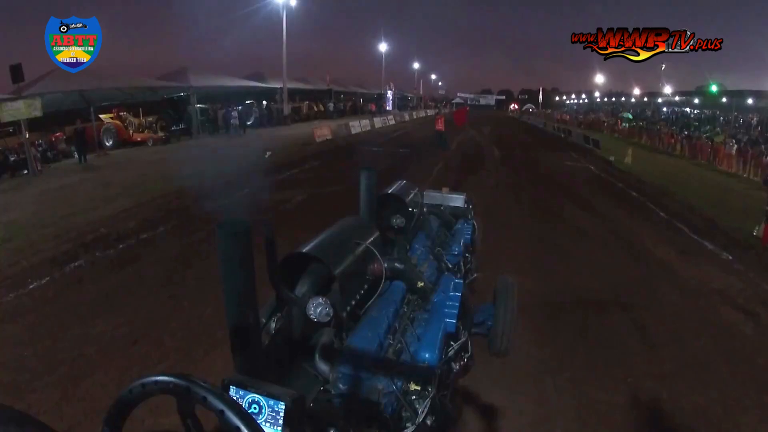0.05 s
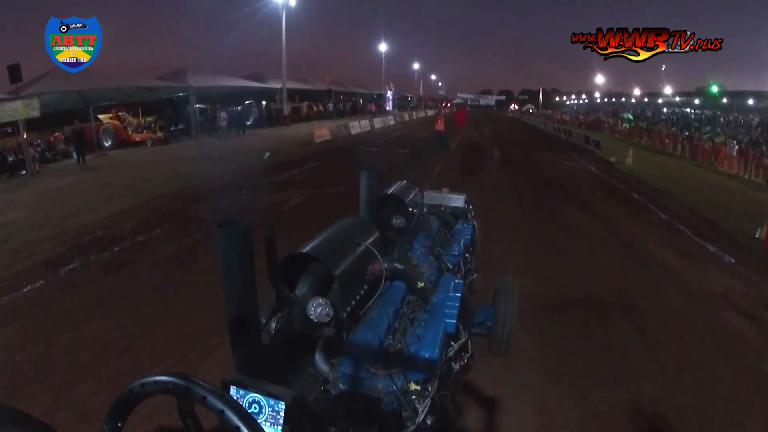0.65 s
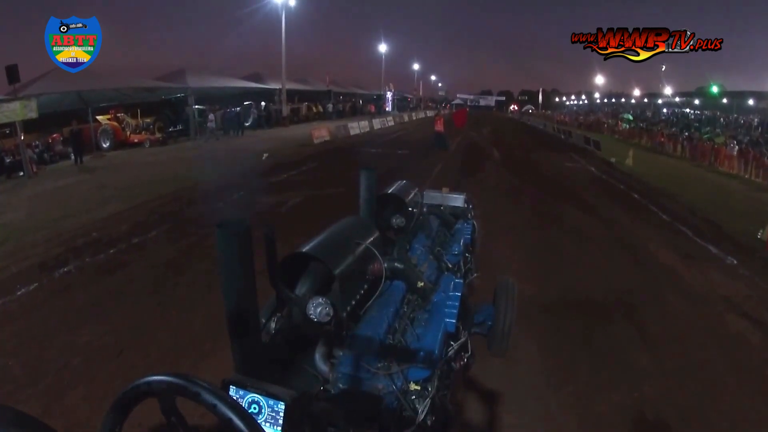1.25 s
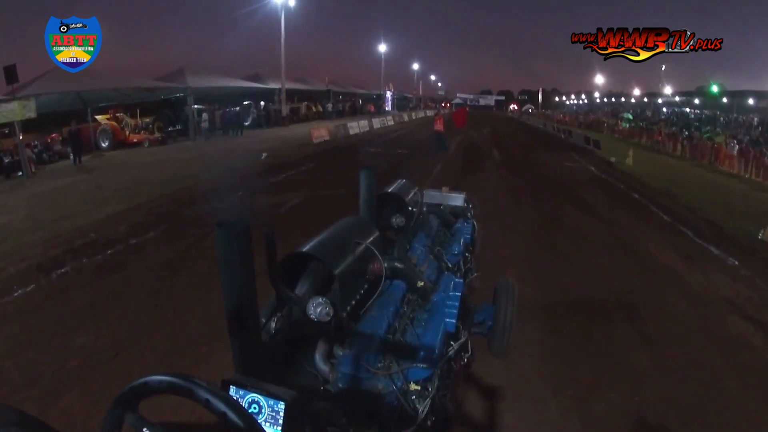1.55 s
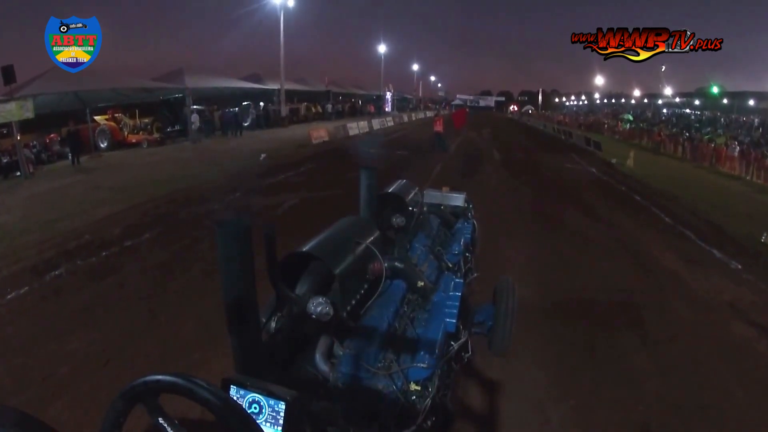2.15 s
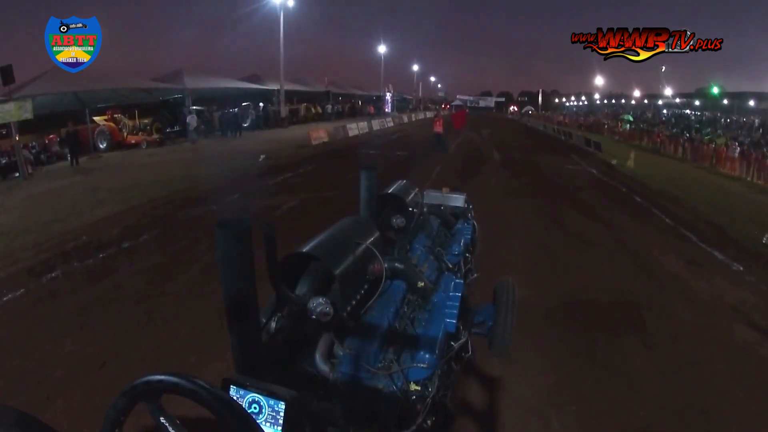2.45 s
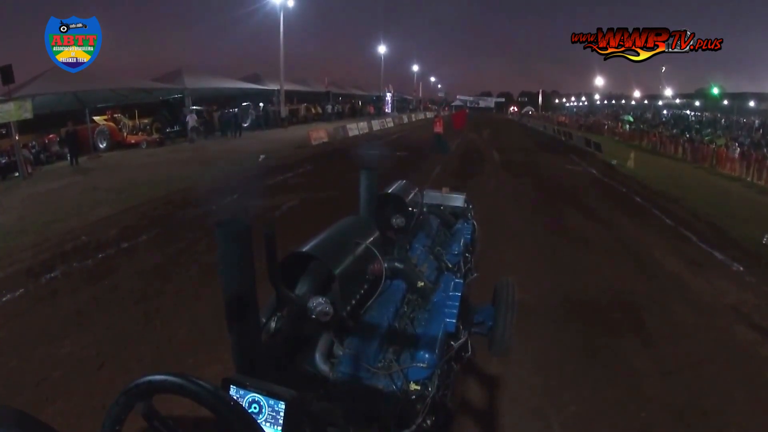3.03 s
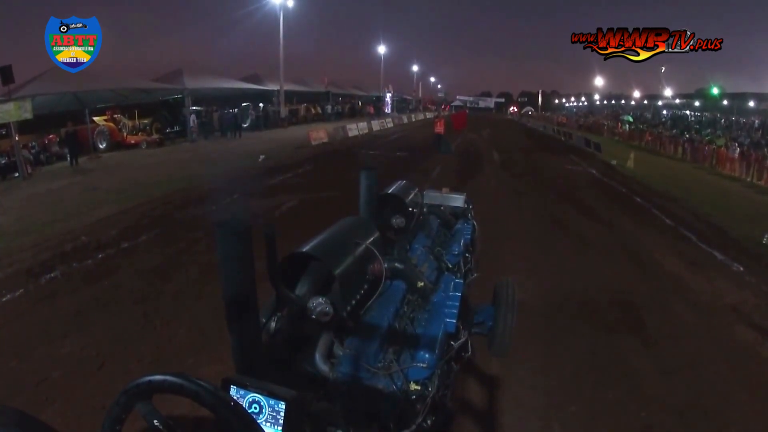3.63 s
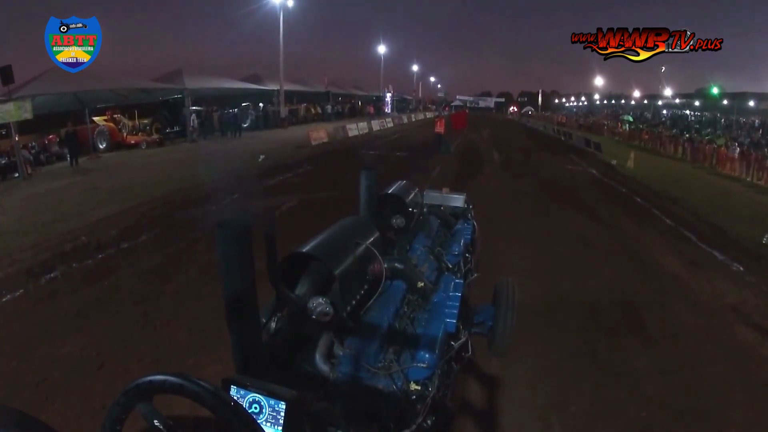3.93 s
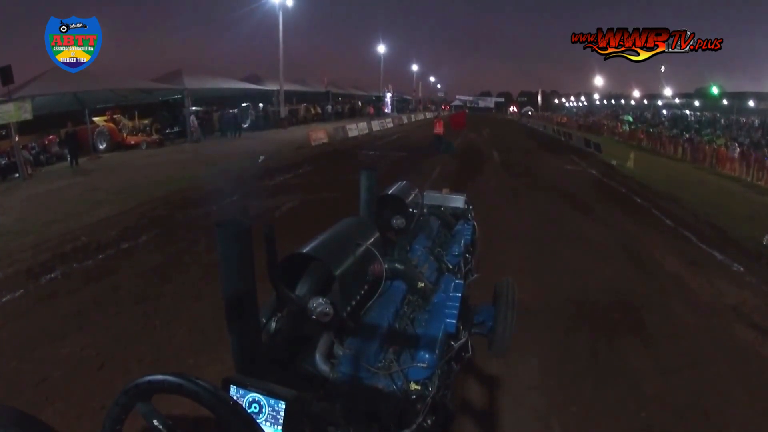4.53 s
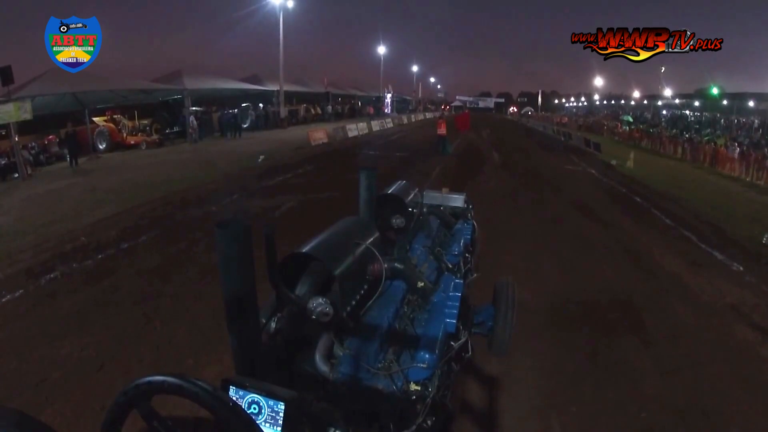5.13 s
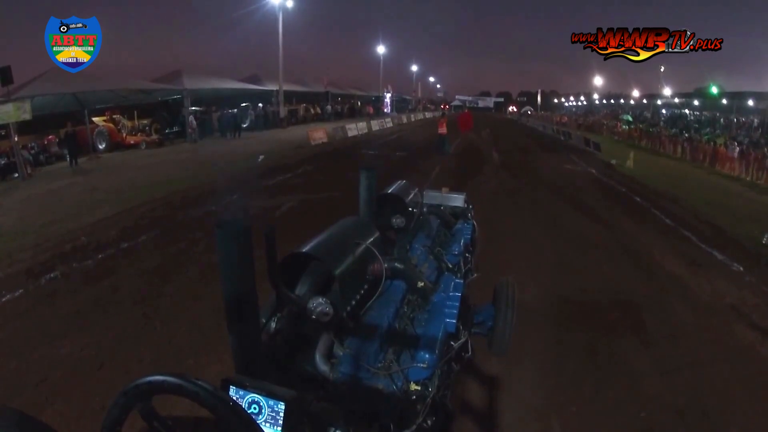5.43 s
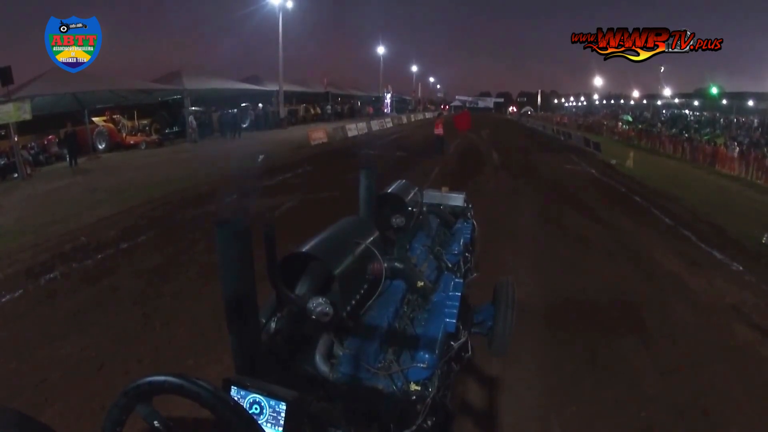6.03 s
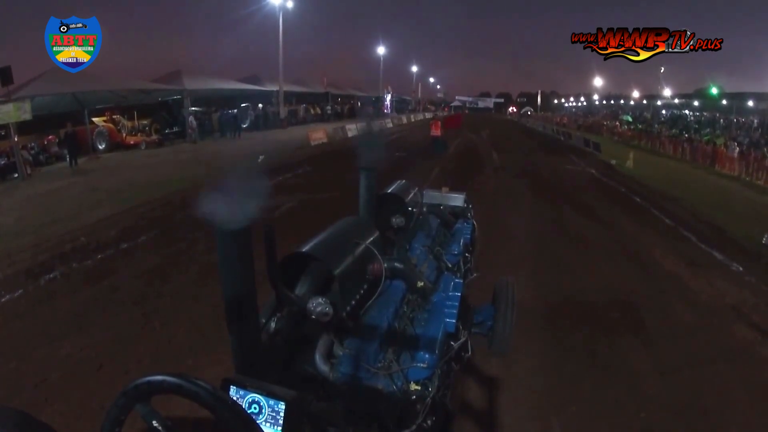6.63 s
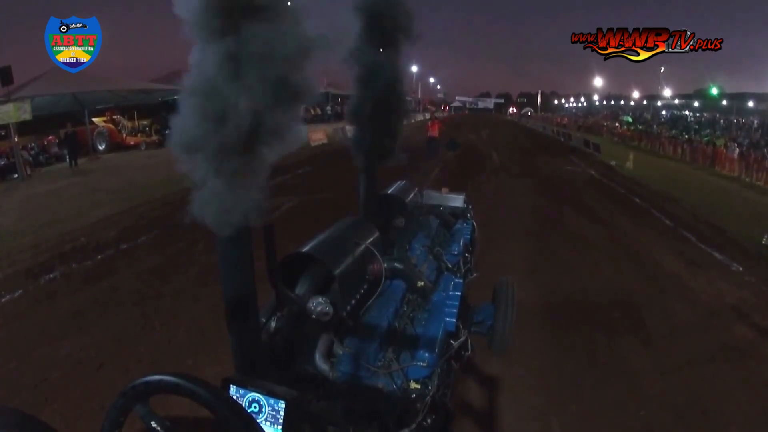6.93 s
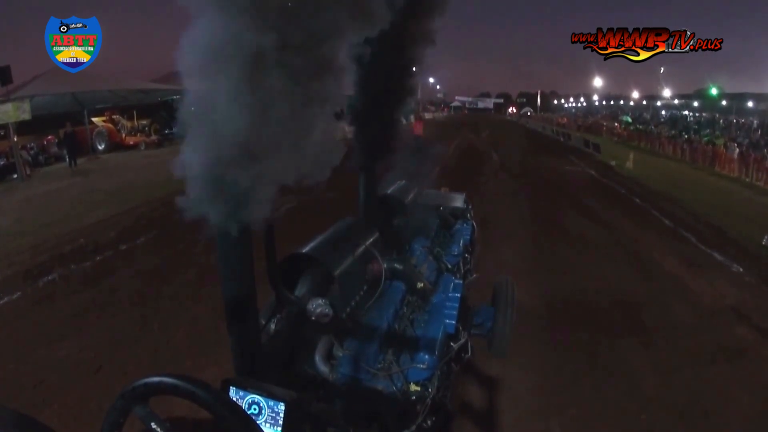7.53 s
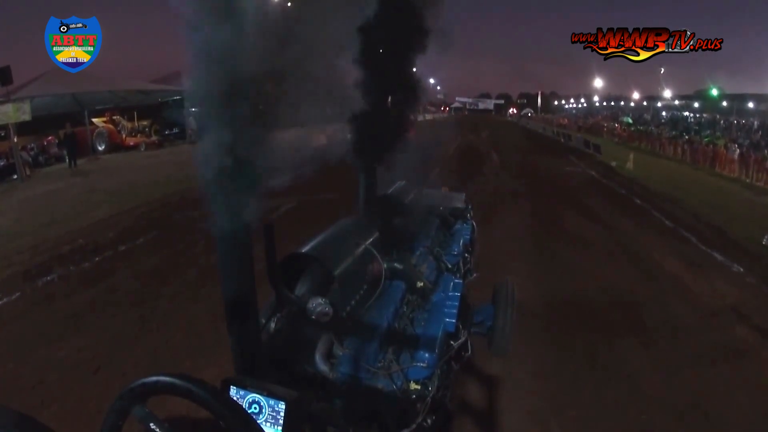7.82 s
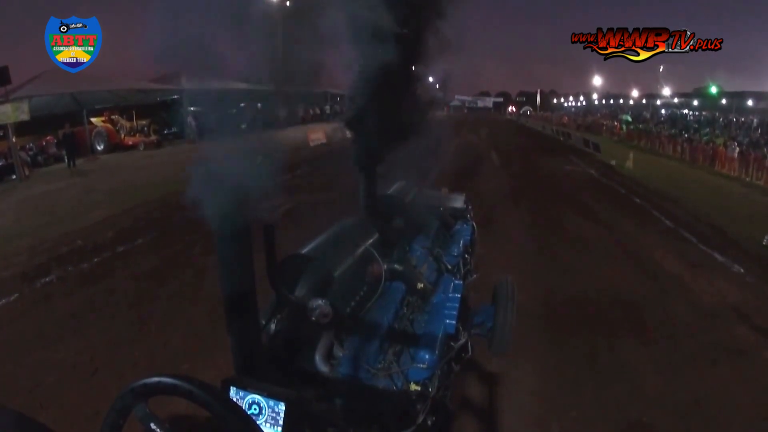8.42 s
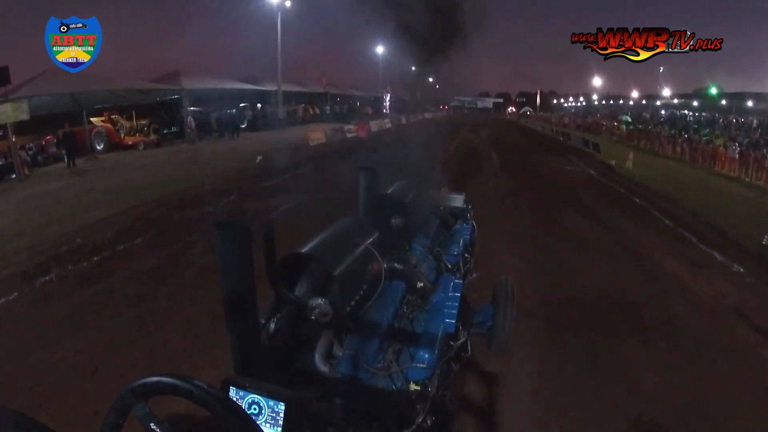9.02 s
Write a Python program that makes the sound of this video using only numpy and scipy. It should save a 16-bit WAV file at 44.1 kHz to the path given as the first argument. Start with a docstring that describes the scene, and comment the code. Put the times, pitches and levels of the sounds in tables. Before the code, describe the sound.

A six-cylinder diesel pulling tractor is heard close up from the driver's seat. For the first six seconds it lopes at idle in quick, uneven surges: the exhaust stack booms, chugs and spits gas, the valve gear clatters, and the hardest firings clack on the engine block. A faint, short hoot falls in pitch at about 1 second. Between 5.7 and 6 seconds loose metal clanks three times. From about 6.2 seconds the engine is pulled down under load, with slower, heavy chugs, harder knocking and a thin steel rattle. It sinks to its slowest beat just after 8 seconds, then revs up quickly from about 8.3 seconds into a faster, free-spinning drone that holds until the end, a little past 9 seconds. A faint, thin turbo whistle rises from 8.5 seconds, and one bit of grit ticks close by at about 8.8 seconds.

```python
"""A six-cylinder diesel pulling tractor, heard from the driver's seat.
It lopes at idle in surges of hard firings, is lugged down under load, then revs up free.
Each firing booms and chugs in the exhaust stack, spits gas and knocks; hard ones clack on the block.
Valve gear clatters, thin steel rattles under load, loose metal clanks, one bit of grit ticks close by.
A faint hoot falls early in the idle; the turbo whistles faintly at the end."""
import sys
import numpy as np
from scipy import signal
from scipy.fft import rfft, irfft
from scipy.io import wavfile
from scipy.ndimage import uniform_filter1d, minimum_filter1d

SR = 44100
rng = np.random.default_rng(int(sys.argv[2]) if len(sys.argv) > 2 else 0)


def transcribe(signal):
    """Save signal, clipped to [-1, 1], as a 16-bit WAV file at the path in sys.argv[1]."""
    frames = np.atleast_2d(signal).T
    limited = np.clip(frames, -1, 1)
    pcm = np.round(limited * 32767).astype(np.int16)
    wavfile.write(sys.argv[1], SR, pcm)


N = 408807
T = np.arange(N) / SR
IDLE_END_S, LOPE_S = 6.2, 0.15
SURGE_REF_DB, SURGE_PEAK_S = -31, 0.035


def undb(db):
    """Decibels to gain."""
    return 10 ** (np.asarray(db) / 20)


def unit(x):
    """Scale to rms 1."""
    return x / np.sqrt(np.mean(x ** 2))


def even(x, size=13000):
    """Scale to a running rms of 1, keeping the quick throb."""
    return x / np.sqrt(uniform_filter1d(uniform_filter1d(x ** 2, size), size // 2) + 1e-12)


def noise():
    """White noise."""
    return rng.standard_normal(N)


def walk(rate_hz):
    """Smooth random wander, rms 1."""
    return unit(signal.sosfilt(signal.butter(2, rate_hz, fs=SR, output="sos"), noise()))


def curve(table):
    """Join a table's points linearly in time."""
    return np.interp(T, *np.transpose(table))


def lowpass(x, hz):
    """Zero-phase low-pass."""
    return signal.sosfiltfilt(signal.butter(2, hz, fs=SR, output="sos"), x)


def strikes(times, sizes):
    """One impulse at each time."""
    return np.bincount(np.clip(times * SR, 0, N).astype(int), sizes, N + 1)[:N]


def decay(x, decay_s):
    """Give every impulse an exponential tail."""
    return signal.lfilter([1], [1, -np.exp(-1 / (decay_s * SR))], x)


def ring(x, colour, modes=(), size=16384):
    """Pass x through a body with a broad colour and resonances on top."""
    bin_hz = np.arange(size // 2 + 1) * SR / size
    hz, db = np.transpose(colour)
    gain_db = np.interp(np.log(bin_hz + 1), np.log(hz), db)
    for centre_hz, width_hz, peak_db in modes:
        gain_db += peak_db / (1 + (2 * (bin_hz - centre_hz) / width_hz) ** 2)
    # fold the cepstrum for a causal response
    cepstrum = irfft(np.log(undb(gain_db)))
    cepstrum[1:size // 2] *= 2
    cepstrum[size // 2 + 1:] = 0
    response = irfft(np.exp(rfft(cepstrum)))[:size // 2]
    return signal.fftconvolve(x, response)[:N]


def wavering_tone(hz, depth, rate_hz):
    """A sine of rms 1 whose pitch wanders."""
    phase = 2 * np.pi * np.cumsum(hz * (1 + depth * walk(rate_hz))) / SR
    return np.sqrt(2) * np.sin(phase)


def hoot(at_s=1.01, spread_s=0.07, centre_hz=410, fall_hz_per_s=560, level_db=-45):
    """A faint, short tone that falls in pitch."""
    age = T - at_s
    hz = centre_hz - fall_hz_per_s * np.clip(age, -2 * spread_s, 2 * spread_s)
    return undb(level_db) * np.exp(-(age / spread_s) ** 2) * wavering_tone(hz, depth=0.015, rate_hz=60)


# turbo whistle: t/s, level/dB
WHISTLE_LEVEL = [(8.52, -52), (8.615, -51), (8.66, -50), (8.74, -46), (8.85, -42.5), (8.92, -51),
                 (9.2, -57)]


def turbo(start_s=8.5, start_hz=2480, rise_hz_per_s=170):
    """The compressor spools up steadily with a thin whistle."""
    hz = start_hz + rise_hz_per_s * np.maximum(T - start_s, 0)
    whistle = wavering_tone(hz, depth=0.0088, rate_hz=83)
    return (T > start_s) * undb(curve(WHISTLE_LEVEL) + 2 * walk(40)) * whistle


# ring of the grit strike: f/Hz, t60/s, level/dB
GRIT_MODES = [(1410, 0.0088, 0.5), (2800, 0.0052, 4), (3430, 0.0028, -4), (6100, 0.005, -27),
              (10000, 0.0048, -33)]


def grit(at_s=8.757, contact_s=0.00028, gain_db=-7):
    """Grit strikes once, close by; the brief contact rounds the tick's front."""
    age = np.maximum(T - at_s, 0)
    tick = sum(undb(db) * np.exp(-np.log(1000) * age / t60_s) * np.sin(2 * np.pi * hz * age)
               for hz, t60_s, db in GRIT_MODES)
    contact = 1 - np.exp(-(age / contact_s) ** 2)
    return -undb(gain_db) * lowpass(tick * contact, 11000)


# loose metal hits: t/s, level/dB
CLANKS = [(5.702, -35), (5.852, -39), (6.005, -32)]
# their colour: f/Hz, level/dB
CLANK_COLOUR = [(600, -18), (1250, -3), (2100, -3), (3200, -24), (7000, -57)]
# their resonances: f/Hz, width/Hz, level/dB
CLANK_MODES = [(1330, 54, 4.6), (1580, 120, 8.1), (2100, 150, 5.4)]


def clanks(attack_s=0.0033, decay_s=0.013):
    """Loose metal clanks just before the load comes on."""
    onsets, db = np.transpose(CLANKS)
    envelope = decay(decay(strikes(onsets, undb(db)), decay_s), attack_s)
    metal = unit(ring(noise(), CLANK_COLOUR, CLANK_MODES))
    return undb(db.max()) * envelope / envelope.max() * metal


def ticks(times, firing_hz, load, free, base_hz=4150, load_hz=1000, base_db=-87.5, load_db=34.5):
    """A thin metallic tick per firing: louder under load, higher at low speed, gone when free."""
    sizes = undb(3 * rng.standard_normal(len(times)))
    envelope = unit(decay(decay(strikes(times, sizes), 0.008), 0.00055))
    pitch_hz = base_hz + load_hz * load + 42 * (firing_hz[0] - firing_hz)
    phase = 2 * np.pi * np.cumsum(pitch_hz) / SR
    hiss = walk(200) * np.sin(phase) + walk(200) * np.cos(phase)
    return (1 - free) * undb(base_db + load_db * load) * envelope * hiss


# thin steel colour: f/Hz, level/dB
RATTLE_COLOUR = [(1200, -33), (2300, -9), (2800, 13.5), (3200, -10), (4800, 3), (5600, -24), (6400, -52),
                 (10000, -42)]
# its resonances: f/Hz, width/Hz, level/dB
RATTLE_MODES = [(2640, 240, 7.2), (3900, 150, 4), (4700, 180, 3.1)]


def rattle(times, lug, lag_s=0.0049, decay_s=0.0074, scatter_db=3, gain_db=-53):
    """Under load every firing shakes the engine's thin steel parts."""
    sizes = undb(scatter_db * rng.standard_normal(len(times)))
    shake = decay(strikes(times + lag_s, sizes), decay_s) * noise()
    return lug * undb(gain_db) * unit(ring(shake, RATTLE_COLOUR, RATTLE_MODES))


def valve_gear(taps_per_s=260, decay_s=0.00066, scatter_db=2):
    """The valve gear clatters in short, random taps."""
    taps = (rng.random(N) < taps_per_s / SR) * undb(scatter_db * rng.standard_normal(N))
    return unit(decay(taps, decay_s) * noise())


# knock colour: f/Hz, level/dB
KNOCK_COLOUR = [(400, -26.5), (750, -17), (950, -1.5), (1150, -2.5), (1400, -5), (2000, -5.5),
                (3200, -39.5), (6000, -68.5)]
# engine block resonances: f/Hz, width/Hz, level/dB
BLOCK_MODES = [(820, 16, 9.5), (935, 58, 2), (1040, 93, 9.5), (1320, 54, 10)]


def knock(pulses, load, free, attack_s, decay_s=0.0095, load_db=24, free_db=4.5, level_db=-44):
    """Each pulse front rings the block, most when it bites hard or under load."""
    bite = decay(decay(pulses ** 1.5, decay_s), attack_s)
    block = ring(bite * noise(), KNOCK_COLOUR, BLOCK_MODES)
    return undb(level_db) * unit(undb(load_db * load + free_db * free) * block)


# hard first firings of surges: t/s, level/dB
CLACKS = [(0.128, -32), (0.285, -31), (0.882, -33), (1.037, -32), (1.19, -28.5), (1.373, -30), (1.799, -29),
          (2.108, -25), (2.539, -23.5), (2.687, -30), (2.997, -22), (3.295, -26), (3.448, -25.5),
          (3.602, -28), (3.757, -26), (3.908, -29), (4.069, -31.5), (4.217, -28.5), (4.373, -31),
          (4.524, -35), (4.82, -27), (4.969, -29), (5.127, -36), (5.284, -31), (5.443, -23.5)]


def clacks(attack_s=0.0012, t60_s=0.06, detune=0.044, gain_db=-3):
    """A hard firing strikes the block, which rings a little differently each time."""
    age, out = T[:SR // 8], np.zeros(N)
    mode_hz = np.array(BLOCK_MODES)[:, :1]
    envelope = (1 - np.exp(-age / attack_s)) * np.exp(-np.log(1000) * age / t60_s)
    for onset, db in CLACKS:
        stray, phase = rng.standard_normal((2, len(mode_hz), 1))
        partials = np.sin(2 * np.pi * (mode_hz * (1 + detune * stray) * age + phase))
        tone = envelope * (partials / mode_hz ** 2).sum(axis=0)
        tone *= np.sqrt(np.sum(envelope ** 2) / np.sum(tone ** 2))
        start = int(onset * SR)
        out[start:start + len(age)] += undb(db + gain_db) * tone
    return out


# sizzle colour: f/Hz, level/dB
SIZZLE_COLOUR = [(1500, -8.5), (3500, 8), (5400, 4.5), (6200, -10.5), (7300, -7), (9400, -4), (11000, -18),
                 (12100, -13.5), (13000, -39.5)]


def sizzle(puff, level_db=-56.5):
    """The hardest blasts steepen and sizzle."""
    return undb(level_db) * unit(ring(puff ** 1.7 * noise(), SIZZLE_COLOUR))


# exhaust gas colour: f/Hz, level/dB
GAS_COLOUR = [(200, 7), (430, -3.5), (700, -8), (900, -1.5), (1400, -1), (1850, -10), (2800, -15),
              (3100, -22.5), (3800, -21.5), (4800, -27.5), (5500, -50), (6200, -50), (9300, -41),
              (11000, -57.5)]
# metal resonances: f/Hz, width/Hz, level/dB
METAL_MODES = [(790, 25, 8.5), (1060, 17, 0.5), (1120, 100, -2), (2054, 100, 8.5), (2440, 130, 6.5),
               (2730, 130, 7), (4850, 120, 5.5)]


def gas(times, blasts, flow, load, free, opening_s=0.0024, open_s=0.028):
    """Each firing knocks, then puffs until the valve shuts; clatter and steady flow fill the gaps."""
    age = T[:SR // 16]
    valve = (1 - np.exp(-age / opening_s)) * np.exp(-(age / open_s) ** 2)
    pulses = strikes(times, blasts)
    puff = np.abs(signal.fftconvolve(pulses, valve)[:N]) * undb(0.8 * walk(350))
    clatter = undb(-7) * valve_gear()
    # under load the steady rush gives way to puffs
    rush = undb(2 - 0.5 * load) * noise()
    drive = undb(-2 + 4 * load) * puff * noise() + flow * (clatter + rush)
    bark = unit(ring(drive, GAS_COLOUR, METAL_MODES)) * np.std(drive)
    return bark + knock(pulses, load, free, attack_s=opening_s) + sizzle(puff)


# gas blasts of single hard firings: t/s, level/dB
HARD_FIRINGS = [(6.6, -29.5), (6.788, -33.5), (6.875, -31.5), (6.954, -34), (6.982, -40), (7.118, -40.5),
                (7.281, -40), (7.441, -37), (7.583, -36.5), (7.76, -34), (7.919, -31.5), (8.14, -29.5),
                (8.221, -39.5)]


def hard_firings(times, within_s=0.008):
    """Extra strength of single firings that bite hard under load."""
    onsets, db = np.transpose(HARD_FIRINGS)
    return np.max((np.abs(times[:, None] - onsets) < within_s) * undb(db), axis=1)


# gas blasts of fuel surges: t/s, level/dB
SURGES = [(0.127, -29.5), (.283, -29), (0.463, -36), (0.609, -32.5), (0.76, -34.5), (0.883, -29),
          (1.038, -29.5), (1.19, -29.5), (1.356, -32.5), (1.493, -30), (1.647, -37), (1.799, -30),
          (2.047, -36), (2.106, -29), (2.394, -29.5), (2.538, -30), (2.686, -28), (2.994, -30),
          (3.291, -28.5), (3.447, -29.5), (3.6, -29.5), (3.754, -30), (3.909, -30.5), (4.065, -31),
          (4.214, -31.5), (4.372, -32), (4.523, -31.5), (4.668, -35), (4.82, -32), (4.969, -33),
          (5.124, -30), (5.283, -30), (5.444, -30), (5.605, -30.5), (5.75, -33), (5.908, -29), (6.065, -32),
          (6.243, -31.5), (6.541, -32), (6.571, -28), (6.628, -30), (7.091, -32.5), (8.335, -29.5),
          (8.411, -28.5)]


def surges(times, ref_length_s=0.05, doubling_db=12, lead_s=0.00051, build_s=0.0069, first_db=-1):
    """The governor throws in extra fuel for a few firings; stronger surges last longer."""
    onsets, db = np.transpose(SURGES)
    length_s = ref_length_s * 2 ** ((db - SURGE_REF_DB) / doubling_db)
    age = times[:, None] - onsets + lead_s
    strength = (age > 0) * undb(db + first_db * np.exp(-(age / build_s) ** 2))
    return np.max(strength * np.exp(-(age / length_s) ** 4), axis=1)


def chug_sizes(times, lugging, surge_db=-9.5, lug_db=-12, spread_s=0.03, scatter_db=2):
    """Gas slug per firing: sustained while lugging, peaking at a surge's second and third firing."""
    onsets, db = np.transpose(SURGES)
    build = np.exp(-((times[:, None] - onsets - SURGE_PEAK_S) / spread_s) ** 2)
    surging = undb(surge_db) * np.max(build * undb(0.22 * (db - SURGE_REF_DB)), axis=1)
    scatter = undb(scatter_db * rng.standard_normal(len(times)))
    return np.maximum(surging, undb(lug_db) * lugging) * scatter


def chugs(times, firing_hz, lug, idle_hz=92, idle_lag_s=0.003, ring_hz=103, width_hz=30, ring_db=1.5):
    """A slug of gas makes one rounded pressure swing, longer at low speed, and rings the stack."""
    lugging = np.interp(times, T, lug)
    sizes = chug_sizes(times, lugging)
    centres = times + 0.45 / np.interp(times, T, firing_hz) + idle_lag_s * (1 - lugging)
    nearest = np.searchsorted((centres[1:] + centres[:-1]) / 2, T)
    pitch_hz = idle_hz * (firing_hz / firing_hz[0]) ** 0.85
    offset_sq = (np.pi * pitch_hz * (T - centres[nearest])) ** 2
    rebound = 0.73 * (1 - lug) + 0.63 * lug
    swing = lowpass(sizes[nearest] * (2 * rebound * offset_sq - 1) * np.exp(-offset_sq), 400)
    swing = swing - lowpass(swing, 17)
    ringing = signal.lfilter(*signal.iirpeak(ring_hz, ring_hz / width_hz, fs=SR), swing)
    return swing + undb(ring_db) * ringing


# drone partials: multiple of the crank rate
DRONE_ORDERS = [3, 5, 6, 7, 10]
# per partial: level/dB
DRONE_DB = [-14, -13.5, -3.5, -18.5, -24]


def drone(count, flutter_db=3, stray_rad=0.35):
    """Multiples of the crank rate, three firings to a turn, lock on to the pipe and waver."""
    angle = 2 * np.pi * count / 3
    return sum(undb(db + flutter_db * walk(18)) * np.sqrt(2) * np.sin(order * angle + stray_rad * walk(17))
               for order, db in zip(DRONE_ORDERS, DRONE_DB))


def lope(surge_db=-1, between_db=-3, spread_s=0.04):
    """Gain of the boom at idle: it swells with each surge and sinks between them."""
    age = T[::100, None] - np.array(SURGES)[:, 0]
    swell = np.max(np.exp(-((age - SURGE_PEAK_S) / spread_s) ** 2), axis=1)
    swell = np.interp(T, T[::100], swell)
    idling = np.clip((IDLE_END_S - T) / LOPE_S, 0, 1)
    return undb((surge_db * swell + between_db * (1 - swell)) * idling)


# colours of the stack's deep thud, boom and upper pipe tones: f/Hz, level/dB
THUD_COLOUR = [(10, -37), (22, -7.5), (32, -11.5), (46, -4.5), (55, -2.5), (70, -7), (200, -62),
               (2000, -130)]
BOOM_COLOUR = [(25, -32.5), (45, -15), (60, -5.5), (75, -8), (98, -1.5), (118, 1.5), (135, -6.5),
               (160, -16), (260, -16.5), (500, -102.5), (4000, -130)]
PIPE_COLOUR = [(100, -19.5), (150, 2), (190, 1.5), (220, 2.5), (250, -6.5), (320, -8), (365, -19.5),
               (450, -29.5), (700, -45.5), (1500, -94), (6000, -120)]
# stack resonances: f/Hz, width/Hz, level/dB
STACK_MODES = [(86.6, 29, 9), (111.4, 11, -1), (305.7, 21.8, 6.5)]
# upper pipe tones: t/s, level/dB
PIPE_LEVEL = [(.9, -28.5), (1.9, -25.5), (2.15, -23), (2.65, -27), (3.0, -24.5), (3.3, -26), (4.2, -32.5),
              (4.55, -28), (5.8, -25), (6.2, -29.5), (6.65, -25), (7.15, -23.5), (7.8, -24.5), (8.42, -23),
              (8.85, -26.5)]


def stack(times, sizes, count, load, free, lug, lag_s=0.004087, wake_s=0.14, labour_hz=100):
    """Pressure pulses and the turbulence behind them boom in the exhaust stack."""
    pulses = strikes(times + lag_s, sizes)
    wake = decay(pulses, wake_s)
    push = -unit(pulses - pulses.mean())
    thud, boom, pipe = (even(ring(push + undb(rumble_db) * unit(wake * noise()), colour, STACK_MODES))
                        for colour, rumble_db in [(THUD_COLOUR, -7), (BOOM_COLOUR, -5), (PIPE_COLOUR, -4)])
    # a labouring engine's longer pulses deepen the tone
    boom = (1 - load) * boom + load * even(lowpass(boom, labour_hz))
    boom = lope() * even(boom + free * drone(count))
    thud_db = -21 + 3.5 * lug - 11 * free
    boom_db = -14.5 - 3 * lug + free
    return undb(thud_db) * thud + undb(boom_db) * boom + undb(curve(PIPE_LEVEL)) * pipe


def crank(firing_hz, lope_share=0.09):
    """Running count of firings; at idle each surge catches the crank at its slowest and spins it up."""
    surge_s = np.array(SURGES)[:, 0]
    age = T - surge_s[np.maximum(np.searchsorted(surge_s, T) - 1, 0)]
    swing = np.cos(2 * np.pi * age / LOPE_S) * (age > 0) * (age < LOPE_S) * (T < IDLE_END_S)
    count = np.cumsum(firing_hz * (1 - lope_share * swing)) / SR
    # every surge and hard firing lands on a whole count
    hard_s = np.sort(np.array(SURGES + HARD_FIRINGS)[:, 0])
    at_hard = np.interp(hard_s, T, count)
    whole = np.cumsum(np.round(np.diff(at_hard, prepend=0)))
    return count + np.interp(T, hard_s, whole - at_hard)


# imbalance of the six cylinders, in firing order: level/dB
CYLINDERS_DB = [-3, -1.5, -6, -4.5, -1, -0.5]


def firings(count, flow, load, free, lug, jitter_s=0.0015, scatter_db=4.5, blast_scatter_db=1.5):
    """Time, pressure pulse and gas blast of each firing."""
    index = np.arange(np.ceil(count[0]), count[-1]).astype(int)
    due_s = np.interp(index, count, T)
    time_draw, size_draw, blast_draw = rng.standard_normal((len(index), 3)).T
    uneven_db = np.array(CYLINDERS_DB)[index % len(CYLINDERS_DB)] + scatter_db * size_draw
    base_fuel = np.interp(due_s, T, flow * undb(1 - 0.5 * free))
    extra_fuel = np.maximum(surges(due_s), hard_firings(due_s))
    # lean firings stray; well-fuelled or lugging ones are steadier
    lean = base_fuel / np.hypot(base_fuel, extra_fuel)
    stray = lean * (1 - 0.8 * np.interp(due_s, T, lug))
    times = due_s + jitter_s * stray * time_draw
    sizes = lean ** -0.6 * undb(stray * uneven_db)
    # blasts even out under load or at speed
    spread = 1 - 0.65 * np.interp(due_s, T, np.maximum(load, free))
    blast_db = spread * (uneven_db + blast_scatter_db * blast_draw)
    return times, sizes, np.hypot(base_fuel * undb(blast_db), extra_fuel)


# firing rate (idle, dragged down, racing): t/s, f/Hz
FIRING_RATE = [(6.1, 39.9), (6.16, 32), (6.25, 30), (6.45, 29), (6.55, 31.5), (6.63, 39), (6.7, 38.5),
               (6.8, 35), (6.9, 36), (6.98, 38), (7.1, 35.5), (7.18, 36), (7.3, 38.3), (7.45, 35.7),
               (7.62, 35), (7.8, 32.5), (7.95, 30), (8.13, 24), (8.27, 25), (8.33, 31), (8.38, 41),
               (8.43, 46.6), (8.52, 52), (8.8, 56.5), (9.1, 58.1)]
# engine load: t/s, load/0-1
LOAD = [(6.1, 0.5), (6.3, .63), (6.7, 0.74), (7.55, 0.75), (8.42, 0.7), (8.52, 0.1)]
# gas flow between surges: t/s, level/dB
GAS_FLOW = [(.3, -40.5), (1.2, -42), (1.95, -42.5), (2.13, -36), (2.35, -41.5), (2.8, -42.5), (2.97, -37.5),
            (3.2, -42), (3.7, -41.5), (4.15, -45.5), (4.9, -41), (5.55, -39), (5.8, -35.5), (6.2, -40),
            (6.65, -35.5), (7.35, -33.5), (8.4, -35), (8.6, -37)]


def scene(free_above_hz=42, free_range_hz=8.1, lug_range=0.19):
    """One crank times the exhaust, rattle and ticks; the other sounds keep their own times."""
    firing_hz, load, flow = curve(FIRING_RATE), curve(LOAD), undb(curve(GAS_FLOW))
    free = np.clip((firing_hz - free_above_hz) / free_range_hz, 0, 1)  # 1: spinning free
    lug = np.clip((load - load[0]) / lug_range, 0, 1)  # 1: fully lugging
    count = crank(firing_hz)
    times, sizes, blasts = firings(count, flow, load, free, lug)
    exhaust = stack(times, sizes, count, load, free, lug) + chugs(times, firing_hz, lug)
    exhaust += gas(times, blasts, flow, load, free)
    metal = rattle(times, lug) + clacks() + clanks() + ticks(times, firing_hz, load, free)
    return (exhaust + metal + grit() + turbo() + hoot())[None]


def record(dry, start_s=0.046, fade_s=0.0076, ceiling=0.46, window=600, top_hz=12800):
    """Quick fade-in, a limiter on the loudest booms, a steep treble cut."""
    sound = dry * np.clip((T - start_s) / fade_s, 0, 1)
    gain = ceiling / np.maximum(np.abs(lowpass(sound, 600)), ceiling)
    limited = sound * uniform_filter1d(minimum_filter1d(gain, window), window)
    return signal.sosfilt(signal.ellip(8, 0.2, 70, top_hz, fs=SR, output="sos"), limited)


dry = scene()
out = record(dry)
transcribe(out)
```